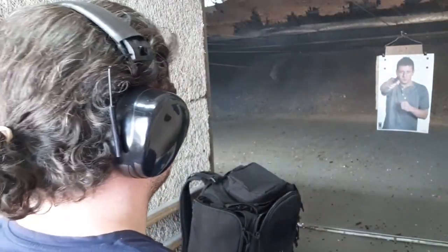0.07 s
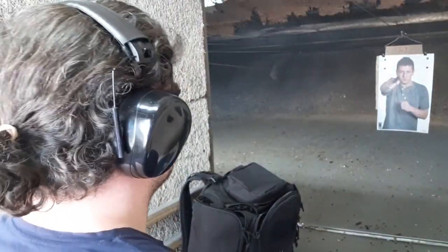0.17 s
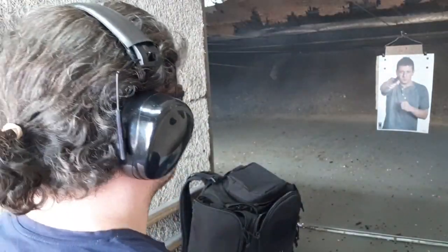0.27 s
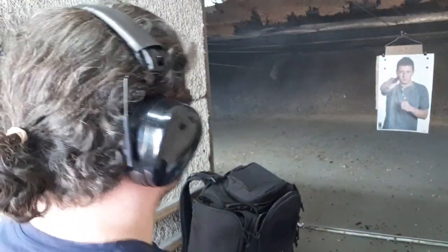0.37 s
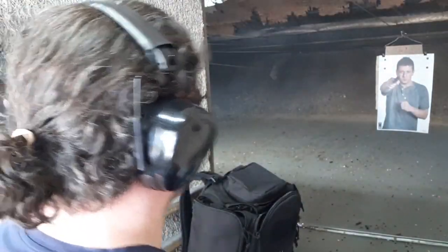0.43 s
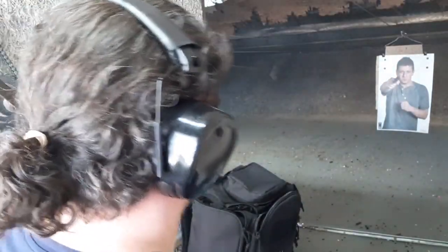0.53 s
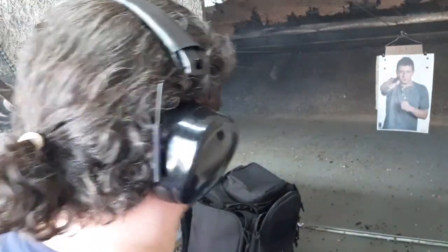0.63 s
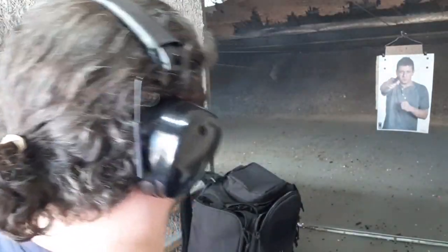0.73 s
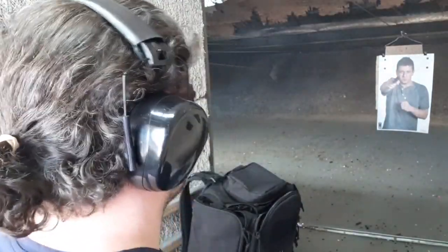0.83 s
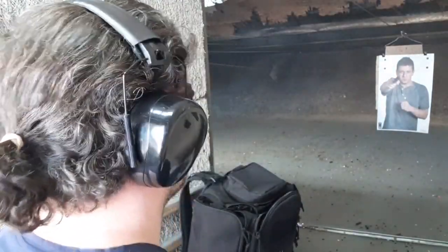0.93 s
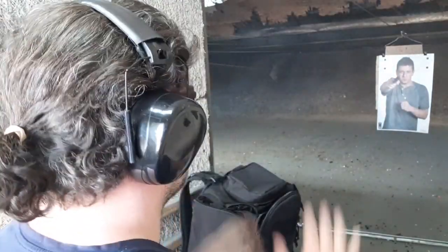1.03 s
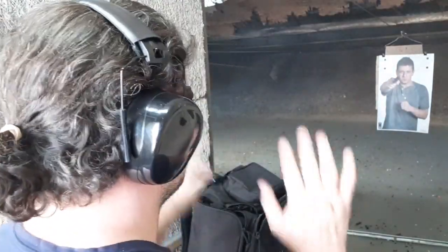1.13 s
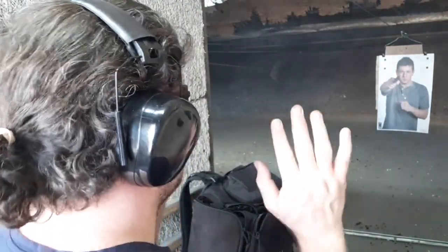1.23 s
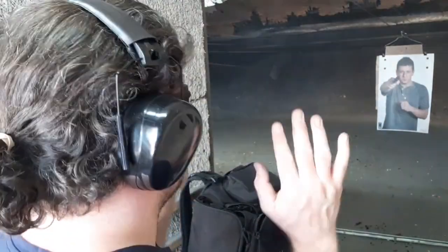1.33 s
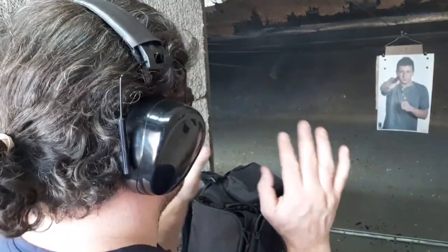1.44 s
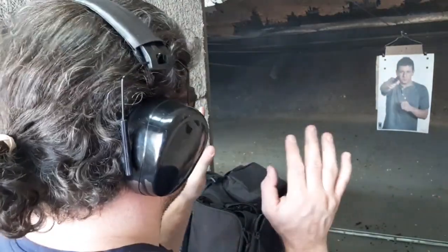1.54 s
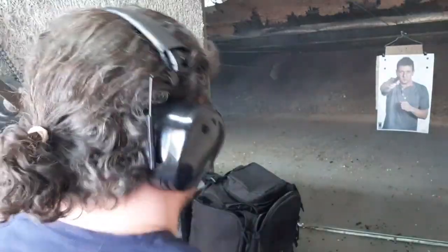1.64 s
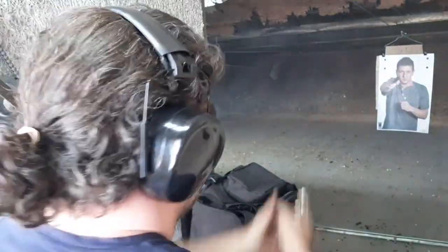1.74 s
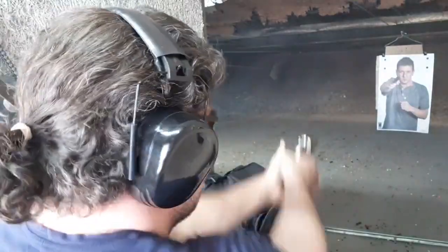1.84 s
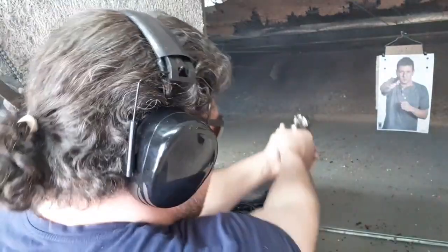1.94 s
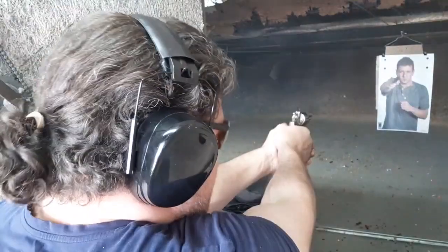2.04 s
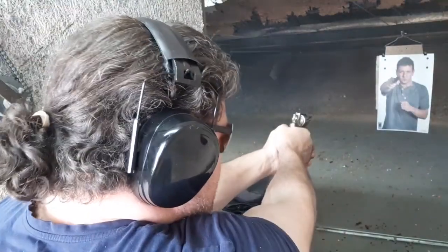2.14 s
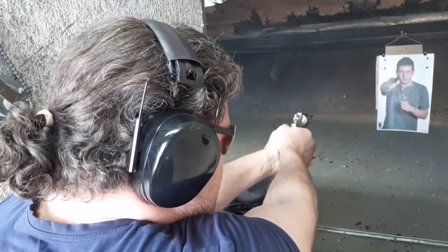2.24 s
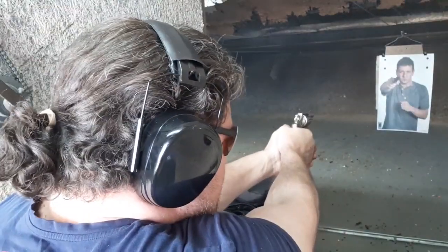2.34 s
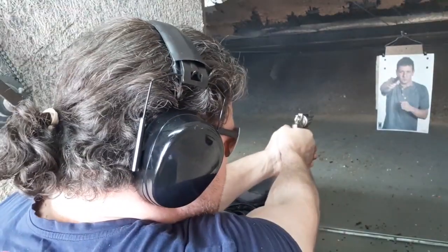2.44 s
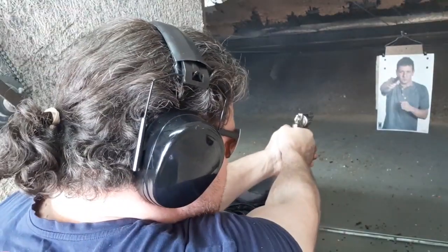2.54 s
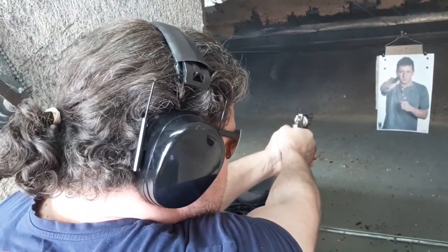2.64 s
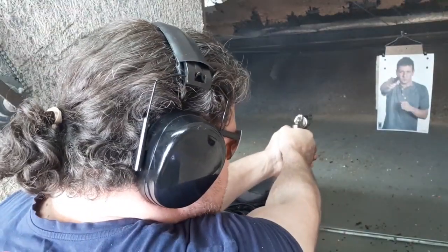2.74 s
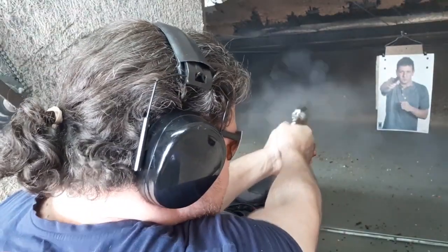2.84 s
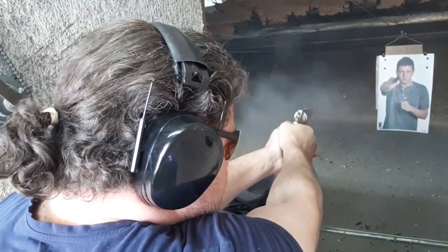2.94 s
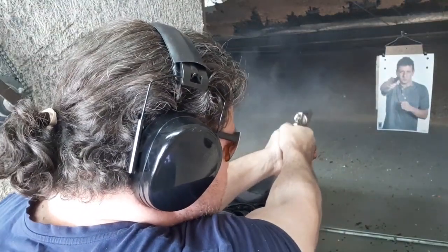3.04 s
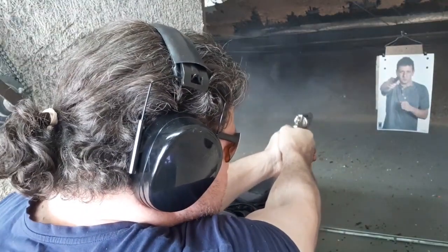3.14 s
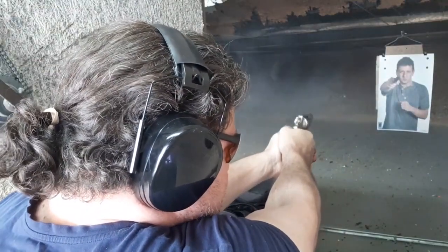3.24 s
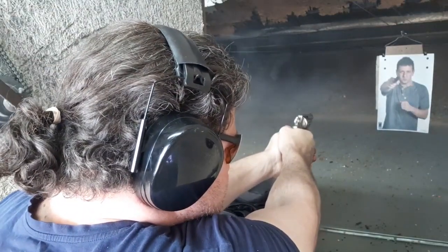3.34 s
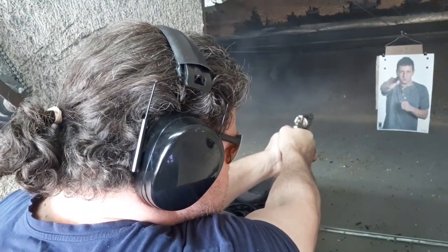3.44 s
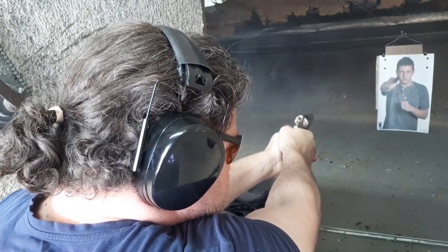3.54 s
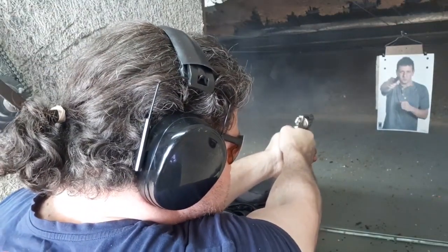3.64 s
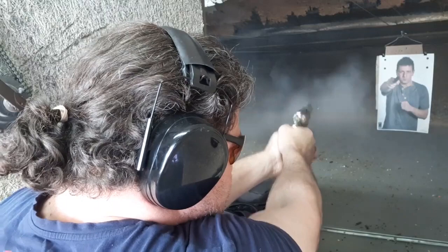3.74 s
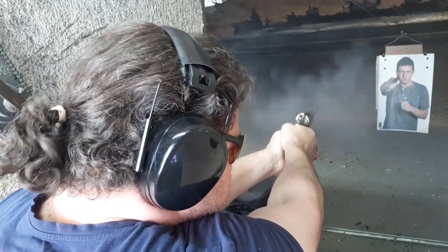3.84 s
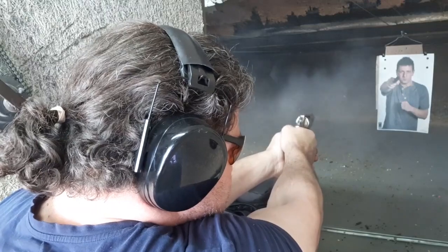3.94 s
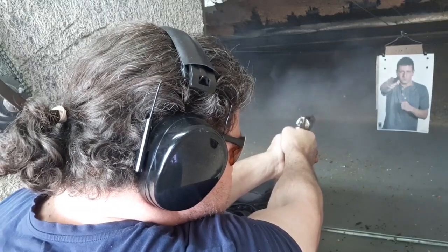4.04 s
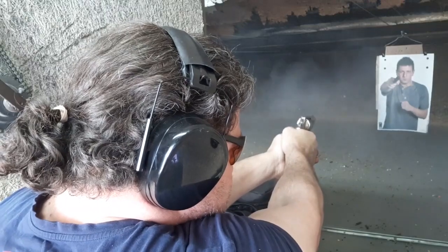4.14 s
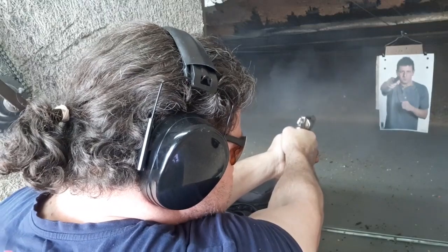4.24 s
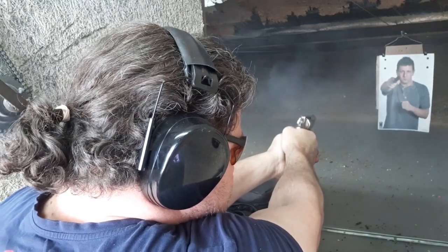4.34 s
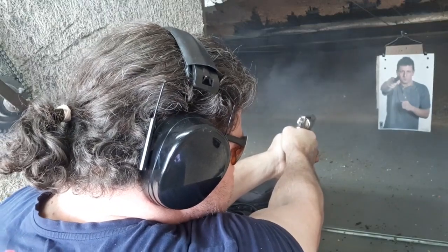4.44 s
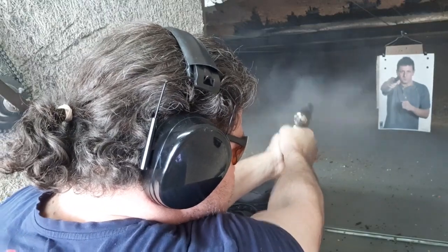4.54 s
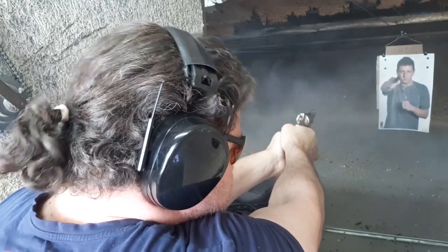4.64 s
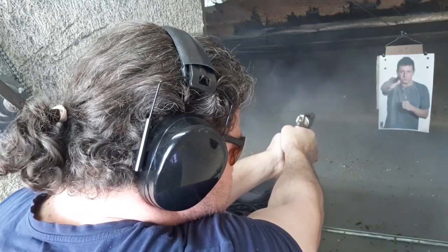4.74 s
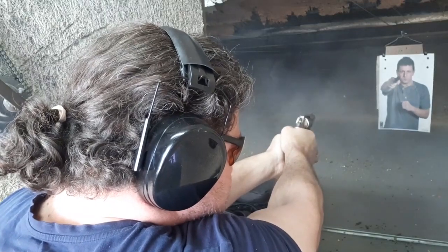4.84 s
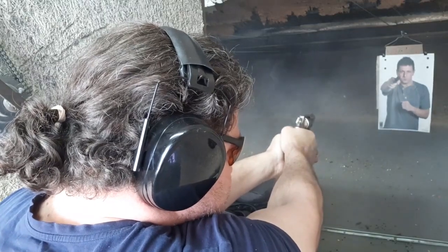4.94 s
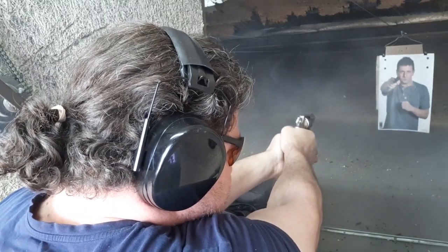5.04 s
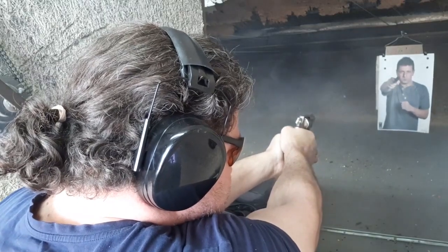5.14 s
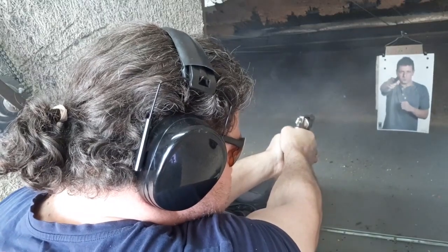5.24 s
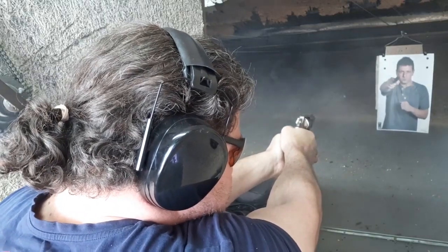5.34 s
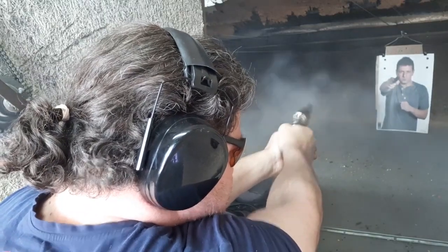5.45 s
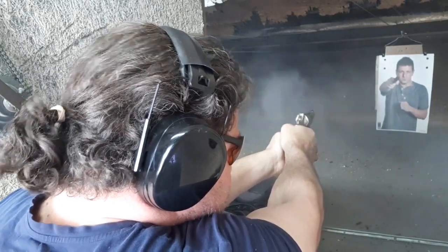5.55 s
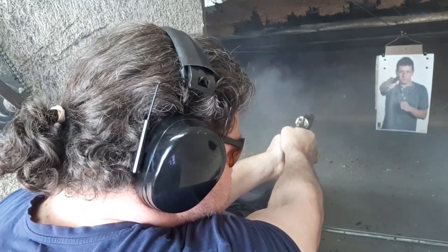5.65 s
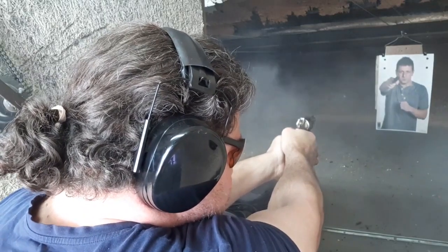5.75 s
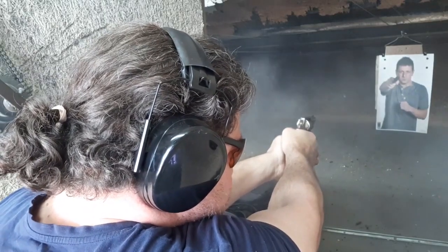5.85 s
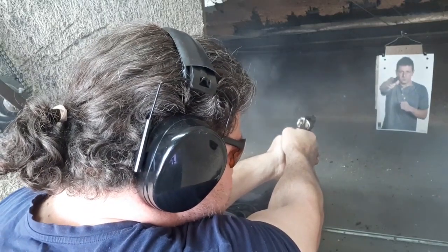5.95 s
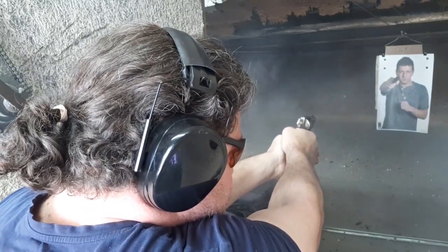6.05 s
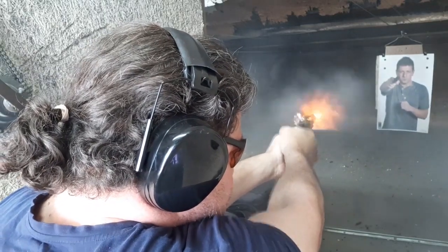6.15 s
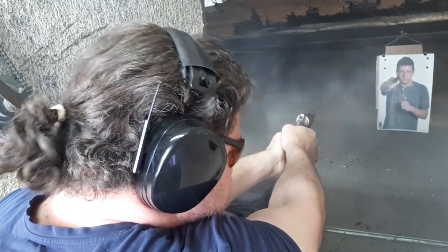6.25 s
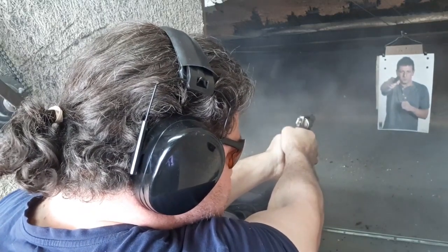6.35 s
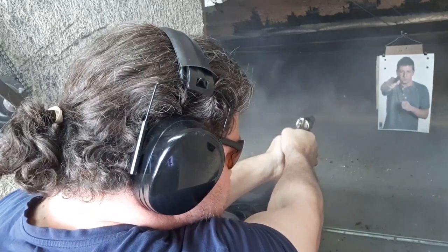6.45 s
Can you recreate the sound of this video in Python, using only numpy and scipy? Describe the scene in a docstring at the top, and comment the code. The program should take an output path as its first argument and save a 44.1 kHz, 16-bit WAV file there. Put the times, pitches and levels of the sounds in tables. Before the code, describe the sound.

Ventilation hums in a covered shooting range. A pistol in the next lane fires twice, with brass cases clinking on concrete and one dull, distant shot in between. Then a revolver fires five sharp shots at arm's length, just under a second apart, with faint metal clicks around them. Each blast rings briefly through the hall. The nearby shots overload the microphone, and the sound sits almost entirely on the left.

```python
"""A covered shooting range, where the ventilation hums and empty brass cases clink on the concrete.
A pistol in the next lane fires twice and a far gun once. Then a revolver an arm's length away fires
five times: on each pull the cylinder locks, the hammer falls, the shot goes off and the trigger resets.
Each blast is a push of air that sets the hall ringing. The nearby shots overload the left microphone;
the right one is nearly dead."""
import sys
import numpy as np
from scipy import signal
from scipy.fft import rfft, irfft
from scipy.io import wavfile

SR = 44100
rng = np.random.default_rng(int(sys.argv[2]) if len(sys.argv) > 2 else 0)


def master(y):
    """Save y as 16-bit WAV."""
    cut = np.clip(np.atleast_2d(y).T, -1, 1)
    pcm = np.round(cut * 32767)  # scale
    wavfile.write(sys.argv[1], SR, pcm.astype(np.int16))


N = 286209
SOUND_SIZE = 48000   # samples in one shot, click or clink
AGE = np.arange(SOUND_SIZE) / SR   # seconds since that sound began


def from_db(db):
    """Turns decibels into a number to multiply a sound by."""
    return 10 ** (np.asarray(db) / 20)


def rms_one(x):
    """Scales a sound so that its average strength (rms) is 1."""
    return x / np.sqrt(np.mean(x ** 2) + 1e-20)


def at_hz(points, hz):
    """Reads a table at any pitch, sliding between its rows on a musical (log) scale."""
    log_pitches, values = zip(*[(np.log(pitch), value) for pitch, value in points])
    return np.interp(np.log(hz + 1), log_pitches, values)


def fade(fade_s):
    """Dies away by 60 dB in fade_s seconds; all fade times below mean this."""
    return from_db(-60 * AGE / fade_s)


def add(out, start_s, sound):
    """Mixes a sound in at the given time."""
    i = max(round(start_s * SR), 0)
    out[..., i:i + sound.shape[-1]] += sound[..., :max(out.shape[-1] - i, 0)]


def dull(x, hz):
    """Softens the treble above hz."""
    return signal.sosfilt(signal.butter(2, hz, fs=SR, output="sos"), x)


def between(x, low_hz, high_hz, order=2):
    """Keeps the part of a sound between two pitches."""
    return signal.sosfilt(signal.butter(order, [low_hz, high_hz], "band", fs=SR, output="sos"), x)


def noise(tone, size=SOUND_SIZE):
    """Noise of strength 1, with its bass and treble shaped by a table."""
    gains = from_db(at_hz(tone, np.fft.rfftfreq(size, 1 / SR)))
    return rms_one(irfft(rfft(rng.standard_normal(size)) * gains, size))


def ring(notes):
    """Pure notes that start together at strength 1 and die away."""
    waves = sum(from_db(db) * fade(fade_s) * np.sin(2 * np.pi * (hz * AGE + rng.random()))
                for hz, db, fade_s in notes)
    return waves / np.sqrt(sum(from_db(db) ** 2 for _, db, _ in notes) / 2)


# The tone of air in the ducts: pitch_hz, level_db
DUCT_TONE = [(25, -37), (48, -23), (75, -11.5), (100, -8.5), (150, -3.5), (300, -6), (650, -8.5),
             (1000, -15.5), (1500, -24), (2100, -22), (2900, -26), (6500, -32), (9000, -36), (16000, -48)]

def ventilation(rush_db=-42.5, hum_hz=64, hum_db=-54):
    """Air rushes through the ducts while the fan hums."""
    rush = from_db(rush_db) * noise(DUCT_TONE, size=N)
    hum = from_db(hum_db) * np.sin(2 * np.pi * hum_hz * np.arange(N) / SR)
    return rush + hum


# The notes of an empty brass case: pitch_hz, level_db, fade_s
CASE_NOTES = [(11500, -0.5, 0.3), (11670, -6, .28), (11720, -9, .27), (11400, -6.5, .12), (11880, -9, .12)]

def case_ring(spin_hz=35, spin_depth=0.43):
    """An empty case rings thinly, and throbs as it spins."""
    throb = 1 - spin_depth * np.cos(2 * np.pi * spin_hz * rng.uniform(.6, 1.4) * AGE)
    return throb * ring(CASE_NOTES)


# The tone of brass hitting concrete: pitch_hz, level_db
CLINK_TONE = [(500, -37.5), (3000, -20), (5200, -12.5), (5900, -0.5), (6600, -2), (8000, -8.5),
              (12000, -24), (16000, -32.5)]
# The tone of that hit scattered round the hall: pitch_hz, level_db
CLATTER_TONE = [(100, -12), (600, 14.5), (2000, -4), (4500, 7), (6500, 0), (9000, -11), (16000, -16.5)]
# Cases landing hard: start_s, clink_db, clatter_db, ring_db
LANDINGS = [(.004, -62, -53, -42), (1.1516, -20, -35, -60), (1.360, -58, -33.5, -39.5),
            (1.742, -47.5, -46, -75), (2.2484, -62, -44, -45)]

def landing_cases(hit_fade_s=0.12, room_db=-6, room_fade_s=0.29, clatter_fade_s=.3):
    """A case hits the floor and rings, and the sound scatters round the hall."""
    out = np.zeros(N)
    for start_s, clink_db, clatter_db, ring_db in LANDINGS:
        dying_away = fade(hit_fade_s) + from_db(room_db) * fade(room_fade_s)
        clink = from_db(clink_db) * noise(CLINK_TONE) * dying_away
        clatter = from_db(clatter_db) * noise(CLATTER_TONE) * fade(clatter_fade_s)
        add(out, start_s, clink + clatter + from_db(ring_db) * case_ring())
    return out


# The tone of a gun's steel parts: pitch_hz, level_db
STEEL_TONE = [(100, -23.5), (1000, -12.5), (2500, -1.5), (4000, 0), (6500, -6.5), (9000, 2.5), (13000, -4),
              (16000, -5.5)]
# Knocks of guns being handled: start_s, level_db, highest_hz
GUN_KNOCKS = [(.305, -31, 4100), (5.05, -41.5, 6500), (5.246, -46, 7000)]

def handling(low_hz=1700, hit_fade_s=0.017, room_db=-10, room_fade_s=.14):
    """Metal held in the hand gives dull knocks that linger briefly in the room."""
    out = np.zeros(N)
    dying_away = fade(hit_fade_s) + from_db(room_db) * fade(room_fade_s)
    for start_s, db, high_hz in GUN_KNOCKS:
        steel = rms_one(between(noise(STEEL_TONE), low_hz, high_hz, order=4))
        add(out, start_s, from_db(db) * steel * dying_away)
    return out


# The tone of the hall: pitch_hz, level_db
HALL_TONE = [(25, -44.5), (55, -24.5), (90, -19.5), (130, -11), (210, -3.5), (400, 0.5), (800, 2),
             (1200, -1), (2000, -10.5), (4000, -12), (6500, -14.5), (9000, -10), (16000, -22.5)]
# How long the hall rings: pitch_hz, fade_s
HALL_FADES = [(50, 1), (160, 0.73), (420, 0.74), (1100, 0.61), (3000, 0.59), (6000, 0.46), (9000, 0.29),
              (15000, 0.21)]

def reverberation(bass_db, treble_db, bands=10):
    """Countless reflections blur into a wash of noise whose treble dies before its bass."""
    hz = np.fft.rfftfreq(SOUND_SIZE, 1 / SR)
    tilt = from_db(at_hz([(300, bass_db), (700, 0.0025), (12000, treble_db)], hz))
    spectrum = rfft(noise(HALL_TONE)) * tilt
    centres_hz = np.geomspace(130, 15000, bands)
    out = np.zeros(SOUND_SIZE)
    for centre_hz, share in zip(centres_hz, np.eye(bands)):
        band = irfft(spectrum * at_hz(zip(centres_hz, share), hz))
        out += band * fade(at_hz(HALL_FADES, centre_hz))
    return out


# Echoes from the side walls and the wall behind the targets: delay_s, level_db, highest_hz
WALL_ECHOES = [(.095, -8.5, 14440), (.145, -10.5, 1497), (0.227, -8, 151)]

def hall_answer(notes, notes_db, build_s, bass_db, treble_db, echo_db):
    """Each microphone meets its own reflections, but both hear the same notes ring between the walls."""
    swell = 1 - np.exp(-AGE / build_s)
    wash = swell * np.array([reverberation(bass_db, treble_db) for _ in range(2)])
    ringing = ring([(hz, db, at_hz(HALL_FADES, hz)) for hz, db in notes])
    out = wash + swell * from_db(notes_db) * ringing
    for delay_s, db, high_hz in WALL_ECHOES:
        add(out, delay_s, from_db(db + echo_db) * dull(wash, high_hz))
    return out


def muzzle_wave(push_s):
    """The barrel sends out one push of air, then a longer suction."""
    return dull((1 - AGE / push_s) * np.exp(-AGE / push_s), hz=1600)


# The tone of a blast bouncing round the shooter's booth: pitch_hz, level_db
BOOTH_TONE = [(30, -19.5), (130, -16.5), (300, 4), (800, -2.5), (2000, 6), (4500, -1.5), (6500, -1),
              (10000, 2.5), (16000, -8.5)]

def gunfire(shots, hall, hall_db, wave_db, push_s, rise_s, burst_fade_s, variation_db):
    """A push of air, a burst of reflections from the booth, then the hall, almost alike every time."""
    out = np.zeros((2, N))
    swell = 1 - np.exp(-AGE / rise_s)
    for *_, shot_s, blast_db in shots:
        burst = np.array([noise(BOOTH_TONE), noise(BOOTH_TONE)]) * swell * fade(burst_fade_s)
        blast = burst + from_db(wave_db) * muzzle_wave(push_s)
        tail = hall + from_db(variation_db) * reverberation(bass_db=3.5, treble_db=-7.5)
        add(out, shot_s, from_db(blast_db) * blast + from_db(hall_db) * tail)
    return out


# Hall notes set ringing from the other lanes: pitch_hz, level_db
OTHER_LANE_NOTES = [(120, -11), (204, -4), (268, -5), (312, -5), (490, 0), (612, -2), (655, -1), (808, -1),
                    (862, -4), (1172, -5), (1272, -4)]
# Shots in the next lane: start_s, blast_db
PISTOL_SHOTS = [(0.3588, 14.5), (2.3762, 13.5)]

def pistol():
    """The pistol fires behind the partition, so its burst swells more slowly."""
    hall = hall_answer(OTHER_LANE_NOTES, notes_db=-12.5, build_s=0.0037,
                       bass_db=-1, treble_db=-1.5, echo_db=-5)
    hall = between(hall, low_hz=94.5, high_hz=15000)
    return gunfire(PISTOL_SHOTS, hall, hall_db=10, wave_db=2, push_s=0.00063,
                   rise_s=0.021, burst_fade_s=0.22, variation_db=-9.5)


def hopping_cases(flight_s=.4, ring_db=-55, hop_s=.24, hop_loss_db=7, touches=3):
    """Each pistol shot throws out a case, which lands softly and hops on, fainter each time."""
    out = np.zeros(N)
    for shot_s, _ in PISTOL_SHOTS:
        touch_s = shot_s + flight_s
        for hop in range(touches):
            add(out, touch_s, from_db(ring_db - hop_loss_db * hop) * case_ring())
            touch_s += hop_s * rng.uniform(.8, 1.2)
    return out


# The shot in a far bay: start_s, blast_db
FAR_SHOT = [(1.6293, -19)]

def far_gun():
    """A distant shot arrives as a small snap and a dull boom from the hall."""
    hall = hall_answer(OTHER_LANE_NOTES, notes_db=-14, build_s=0.0015,
                       bass_db=5, treble_db=-10.5, echo_db=-16)
    hall = between(hall, low_hz=70, high_hz=4500)
    return gunfire(FAR_SHOT, hall, hall_db=-20.5, wave_db=-2, push_s=0.00066,
                   rise_s=.0001, burst_fade_s=0.0043, variation_db=-40.5)


# Pulls of the revolver's trigger: lock_s, shot_s, blast_db
TRIGGER_PULLS = [(2.8204, 2.8466, 22.5), (3.7432, 3.7716, 23), (4.54, 4.5768, 21.5), (5.432, 5.4584, 24),
                 (6.1574, 6.1857, 23.5)]

def revolver_clicks(click_fade_s=0.0056, room_db=-14, room_fade_s=0.091, tick_gap_s=0.16):
    """Steel parts inside the revolver click before and after each shot."""
    out = np.zeros(N)
    dying_away = fade(click_fade_s) + from_db(room_db) * fade(room_fade_s)
    for lock_s, shot_s, _ in TRIGGER_PULLS:
        reset_s = shot_s + .26
        ticks_s = reset_s + np.cumsum(tick_gap_s * rng.uniform(.8, 1.2, 2))
        clicks = [(lock_s, -25.5),   # the cylinder locks
                  (lock_s + .016, -21),   # the hammer falls
                  (reset_s, -40)]   # the trigger springs forward
        clicks += [(tick_s, -47) for tick_s in ticks_s]   # faint ticks while the aim settles
        for start_s, db in clicks:
            steel = between(noise(STEEL_TONE), low_hz=4200, high_hz=15000)
            add(out, start_s, from_db(db) * steel * dying_away)
    return out


# Hall notes set ringing from the revolver's lane: pitch_hz, level_db
REVOLVER_LANE_NOTES = [(115, -12), (139, -10), (206, 0), (331, -2), (405, -5), (490, -5), (530, -4),
                       (662, 0), (805, -6), (845, -5), (932, -3), (965, -4), (1158, -4), (1379, -7),
                       (1575, -9)]

def revolver():
    """The revolver fires close by, with a sudden, sharp blast that fills the hall."""
    hall = hall_answer(REVOLVER_LANE_NOTES, notes_db=-10, build_s=0.011,
                       bass_db=-0.5, treble_db=-1, echo_db=-6.5)
    return gunfire(TRIGGER_PULLS, hall, hall_db=10, wave_db=-30.5, push_s=0.00028,
                   rise_s=0.0013, burst_fade_s=0.14, variation_db=-13)


def scene():
    """All the sounds as they reach the two microphones."""
    return (ventilation() + landing_cases() + handling() + pistol() + hopping_cases()
            + far_gun() + revolver_clicks() + revolver())


def overload(x):
    """Quiet sound passes unchanged; loud peaks are flattened at 1."""
    return x / (1 + x ** 8) ** (1 / 8)


def colour(x, tone, size=4096):
    """Shapes bass and treble by a table (a minimum-phase filter)."""
    gains = from_db(at_hz(tone, np.fft.rfftfreq(size, 1 / SR)))
    cepstrum = irfft(np.log(gains))
    # Folding the second half onto the first keeps the filter from ringing before a sound arrives.
    cepstrum[1:size // 2] *= 2
    cepstrum[size // 2 + 1:] = 0
    click_response = irfft(np.exp(rfft(cepstrum)))
    return signal.oaconvolve(x, click_response)[:len(x)]


# The tone of the left microphone: pitch_hz, level_db
LEFT_TONE = [(30, -1.5), (58, -3.5), (105, -1), (3000, -3.5), (6700, -0.5), (7500, -14.5), (9500, -14),
             (12000, -6), (16000, -6.5)]
# The tone of the nearly dead right microphone: pitch_hz, level_db
RIGHT_TONE = [(40, -41.5), (130, -43.5), (380, -56.5), (620, -48), (1300, -42.5), (2200, -40),
              (4600, -38.5), (5400, -45.5), (7500, -71.5), (12000, -59)]

def record(dry, right_limit=9.0, hiss_db=-92, low_cut_hz=65, high_cut_hz=15900):
    """The left microphone overloads and clips; the right one gives only a faint, thin sound."""
    left = colour(overload(dry[0]), LEFT_TONE)
    left = signal.sosfilt(signal.butter(2, low_cut_hz, "high", fs=SR, output="sos"), left)
    left = np.clip(left, -.97, .97)
    right = colour(right_limit * np.tanh(dry[1] / right_limit), RIGHT_TONE)
    right += from_db(hiss_db) * rng.standard_normal(N)
    treble_cut = signal.ellip(10, .1, 70, high_cut_hz, fs=SR, output="sos")
    return signal.sosfilt(treble_cut, [left, right])


dry = scene()
out = record(dry)
master(out)
```